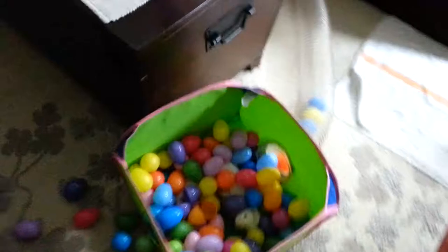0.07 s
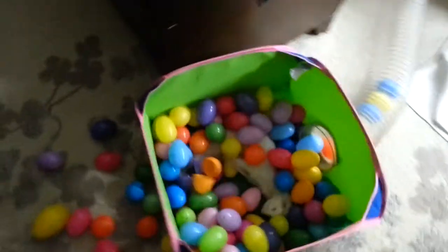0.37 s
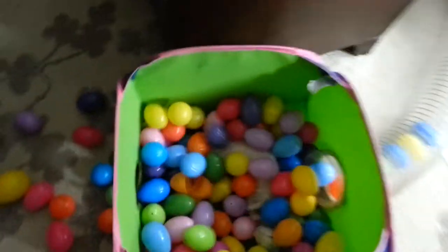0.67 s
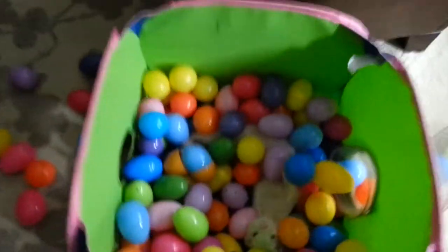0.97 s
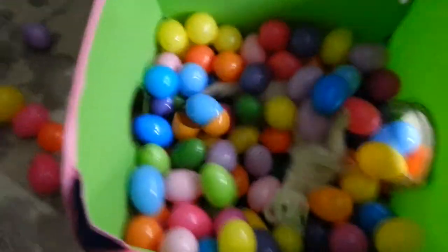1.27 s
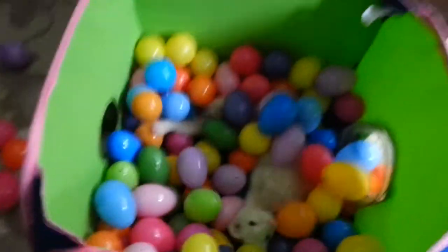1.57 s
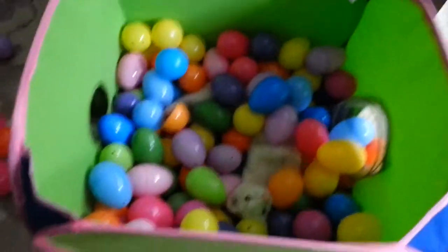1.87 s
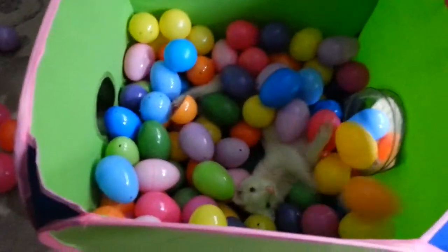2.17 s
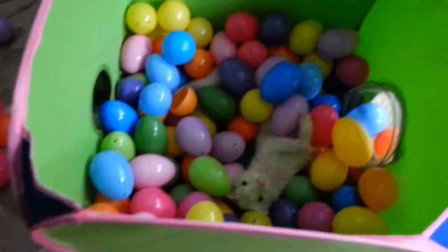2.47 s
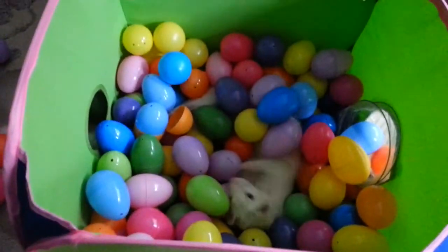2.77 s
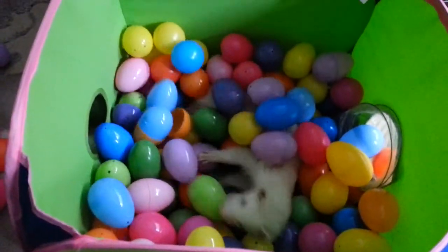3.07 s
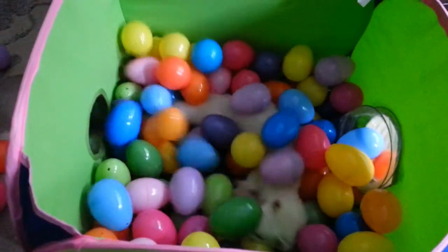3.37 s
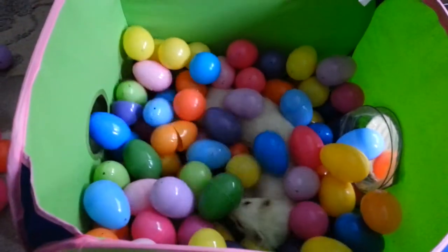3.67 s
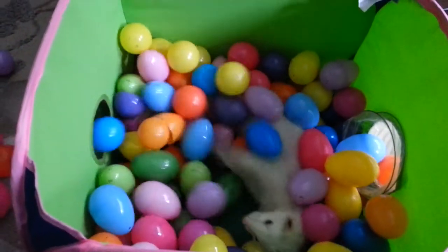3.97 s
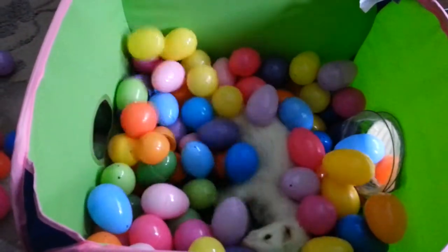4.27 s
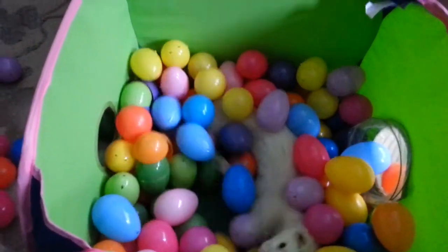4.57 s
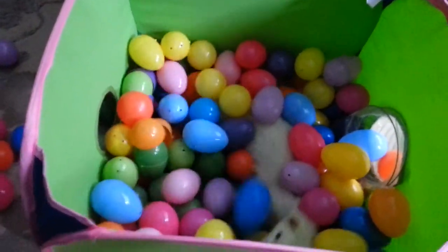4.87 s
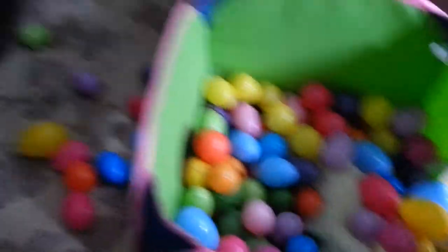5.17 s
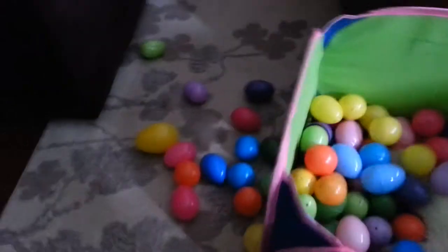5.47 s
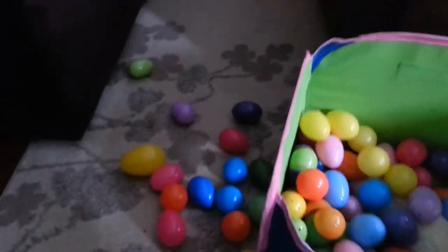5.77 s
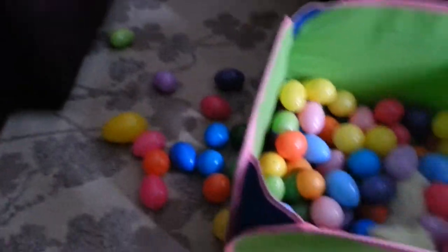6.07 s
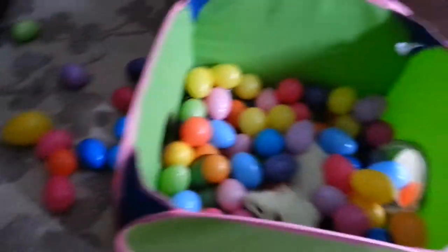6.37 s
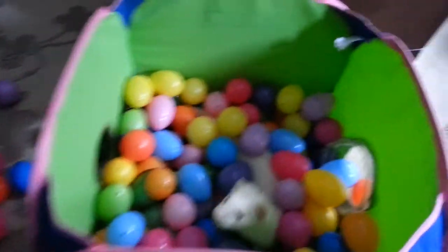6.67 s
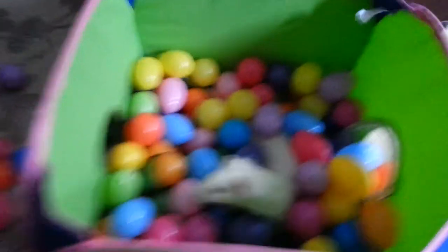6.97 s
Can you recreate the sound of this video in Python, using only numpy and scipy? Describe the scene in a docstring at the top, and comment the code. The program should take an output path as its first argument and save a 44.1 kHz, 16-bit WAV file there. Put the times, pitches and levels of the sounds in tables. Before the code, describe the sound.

A ferret burrows through hollow plastic balls and eggs in a fabric bin. The shells knock, click and snap together over lighter jostling, rubbing and an occasional scrape. The clatter pauses briefly, returns at its busiest with a few soft thuds on the bin's floor, then thins to scattered, softer knocks. It is heard close up, mostly a little to the right, in a small, quiet room.

```python
"""Ferrets burrow through a fabric bin of hollow plastic balls and eggs on a carpet, in a small room.
After 0.4 s of silence, shells knock, click and snap together over a jostle of lighter touches, rubbing
and the odd scrape. The animals pause around 2.5 s, then dig hardest from 3 to 5 s, thudding softly on
the bin's floor. Near 5.5 s the sound swings from the right to the centre, then drifts back to the right
with a few last, softer knocks. A short room wash and a low room tone sit behind it all."""
import sys
import numpy as np
from scipy import signal
from scipy.fft import rfft, irfft, next_fast_len
from scipy.io import wavfile
from scipy.ndimage import uniform_filter1d, map_coordinates

SR = 44100
rng = np.random.default_rng(int(sys.argv[2]) if len(sys.argv) > 2 else 0)


def digitize_waveform(pressure):
    """Quantize a signal to 16-bit integers and store it at the path in sys.argv[1].

    Rows of a 2-D input are taken as channels; values are limited to [-1, 1].
    """
    field = np.atleast_2d(pressure).T
    bounded = np.clip(field, -1, 1)
    quanta = np.round(bounded * 32767).astype(np.int16)
    wavfile.write(sys.argv[1], SR, quanta)


N = 310023
START_S = .425

# Featured collisions: start_s, pitch_hz (of the knock), knock_db, click_db, snap_db
HITS = [(0.439, 2110, -51, -36.5, -63), (0.494, 1770, -26.5, -31, -38), (0.547, 2000, -25, -26.0, -36),
        (0.596, 2010, -22.5, -24.5, -27.5), (0.64, 1150, -19.5, -24.5, -39), (0.658, 1300, -24, -29.5, -44),
        (0.83, 1550, -59, -39, -29), (0.87, 2000, -21.5, -21.5, -29), (0.93, 990, -30, -28.5, -33),
        (0.993, 1980, -24, -36.0, -46), (1.108, 1510, -28.5, -33, -34), (1.129, 1530, -27.5, -29.5, -29.5),
        (1.237, 1650, -21.5, -25, -26.5), (1.269, 1600, -23, -21, -28), (1.344, 1460, -31, -23, -18.5),
        (1.391, 1380, -20.5, -16.5, -35), (1.414, 990, -40, -33, -11), (1.422, 1390, -21, -35, -38),
        (1.497, 1470, -18, -24, -21.5), (1.52, 1640, -18, -18, -25), (1.585, 980, -18, -27.5, -51),
        (1.651, 1240, -24, -14.0, -25.0), (1.749, 2140, -28.5, -36, -47), (1.817, 462, -30.0, -32.5, -35.5),
        (1.836, 2040, -34, -34, -36.5), (1.87, 960, -28, -29.5, -36), (1.901, 1710, -31.5, -40.5, -39),
        (2.004, 1560, -34.0, -39.5, -47), (2.102, 950, -30.5, -27, -38), (2.174, 980, -50, -46, -35.5),
        (2.2, 480, -29.5, -35, -39), (2.247, 920, -30, -36, -41), (2.256, 1580, -35.5, -35, -39),
        (2.341, 1400, -33, -32.5, -36), (2.37, 1710, -29.5, -27.5, -35.5), (2.832, 447, -38, -40.5, -30),
        (3.116, 530, -32, -21, -21), (3.192, 1400, -16.0, -13, -15.0), (3.215, 2100, -18, -20, -28),
        (3.282, 1720, -22.5, -22, -31), (3.296, 870, -25, -17, -22.5), (3.328, 780, -19.5, -21, -18.5),
        (3.357, 1700, -15.5, -23, -23), (3.431, 1620, -18.5, -21.5, -20.5), (3.503, 1730, -24, -28.5, -24),
        (3.552, 1410, -25.5, -34, -32), (3.585, 1300, -19.5, -22.5, -26.5), (3.631, 990, -18.5, -25.5, -30),
        (3.708, 527, -17, -18.5, -26.5), (3.78, 800, -17.5, -24.0, -26), (3.839, 1310, -22.5, -17.5, -24),
        (3.892, 550, -23.5, -15, -19), (3.977, 1280, -20, -25.5, -31.5), (4.044, 1190, -16, -17, -14.5),
        (4.126, 1680, -22.5, -27, -40), (4.171, 1240, -27, -17.5, -18), (4.211, 1790, -19.5, -17.5, -17),
        (4.23, 1370, -24, -19, -14.5), (4.305, 490, -25, -22, -19), (4.419, 840, -22.5, -22, -21),
        (4.46, 1750, -17.5, -17.5, -22), (4.504, 470, -20.5, -13.5, -16), (4.521, 880, -19.5, -20.5, -19),
        (4.593, 830, -44, -23, -16), (4.639, 656, -28, -26, -40), (4.697, 800, -19.5, -21.5, -20),
        (4.73, 660, -23.5, -24, -28), (4.843, 1530, -16, -17.5, -19), (4.949, 1220, -27.5, -27, -23.5),
        (4.995, 800, -27, -17.0, -30), (5.063, 1390, -32.5, -30, -36), (5.11, 634, -27.5, -27.5, -48),
        (5.16, 1010, -26, -36.5, -56), (5.224, 925, -25, -18, -31), (5.25, 1250, -24.5, -19.5, -41),
        (5.305, 1720, -30, -31.0, -30), (5.99, 980, -27, -42.0, -47.5), (6.117, 480, -31, -42, -49),
        (6.15, 507, -41, -41, -44), (6.216, 640, -36.5, -53, -52), (6.256, 1510, -39.5, -49, -57),
        (6.311, 463, -40, -37, -34), (6.409, 625, -35.5, -47.0, -45), (6.534, 950, -44, -39.5, -45.5),
        (6.559, 1600, -36, -40, -39), (6.639, 945, -22.5, -24.5, -33), (6.784, 663, -36, -62, -54),
        (6.84, 700, -37.5, -56, -64), (6.875, 1640, -42, -34.5, -41.5), (6.904, 1000, -27.5, -33.5, -37),
        (7.023, 423, -35.5, -46, -39.5)]
# Where the bin sits in the stereo image: time_s, pan_db (left minus right)
PAN = [(.5, -2.5), (3, -5.5), (5.2, -2), (5.6, 1), (6.2, 0.5), (6.9, -3.5)]
# Modes of a ball's hollow body, stiff shell and thin rim: centre_hz, width_hz, level_db
HOLLOW_MODES = [(491.5, 125, 0), (672, 265, -2), (898, 180, -2), (1326, 225, -3.5), (1570, 430, -5.5),
                (2460, 840, -12.5)]
SHELL_MODES = [(2620, 780, -12), (4027, 700, -4.5), (4600, 490, 1.5), (5670, 1550, -13.5)]
RIM_MODES = [(6700, 2800, -2), (9310, 1170, 0), (11320, 1600, -1.5), (14600, 8300, -6)]


def collisions():
    """Hard hits: the hollow body knocks, the shell clicks and the rim snaps, in a new blend each time."""
    start_s, pitch_hz, knock_db, click_db, snap_db = np.transpose(HITS)
    knock = strike(start_s, knock_db + .5, HOLLOW_MODES, chatter_s=.0021, shadow=.24, pitch_hz=pitch_hz)
    click = strike(start_s, click_db + 1.2, SHELL_MODES, chatter_s=.002, shadow=1.9)
    snap = strike(start_s, snap_db + .6, RIM_MODES, chatter_s=.0018, shadow=1.5)
    return knock + click + snap


def strike(start_s, level_db, modes, chatter_s, shadow, pitch_hz=None, bass_hz=140):
    """Short contacts, each ringing a slightly different ball; shadow scales the level panning."""
    size, count = 1024, len(start_s)
    lead = size // 5
    t, hz = (np.arange(size) - lead) / SR, np.fft.rfftfreq(size, 1 / SR)
    chance = rng.standard_normal((count, len(modes), 2, 1))
    body = 0
    for k, (centre_hz, width_hz, mode_db) in enumerate(modes):
        gain = (-1) ** k * amp(mode_db + 3 * chance[:, k, 0])
        body += gain * resonance(hz, centre_hz * np.exp(.098 * chance[:, k, 1]), width_hz)
    if pitch_hz is not None:
        body += amp(7) * resonance(hz, pitch_hz[:, None], width_hz=pitch_hz[:, None] / 9.2)
    # a brief slip, the impact, then the shell chatters against its neighbours
    age = np.maximum(t, 0)
    slip = amp(-18) * np.exp(-abs(t) / .0018)
    impact = (1 - np.exp(-age / .0004)) * np.exp(-age / chatter_s)
    push = rfft((slip + impact) * rng.standard_normal((2, count, size)))
    # three weak echoes off nearby balls, bin and furniture colour each contact
    delay_s = rng.uniform(.002, .012, (count, 3, 1))
    comb = 1 + amp(-15) * np.sum(np.exp(-2j * np.pi * hz * delay_s), axis=1)
    radiation = (1j * hz / (bass_hz + 1j * hz)) ** 2  # a ball is too small to radiate bass
    pair = stereo(*push, hz, apart_hz=2500) * body * comb * radiation
    # the far side is later and weaker
    pan_db = curves(PAN, start_s)[0][:, None] + 1.63 * rng.standard_normal((count, 1))
    side_db = np.array([.5, -.5])[:, None, None] * pan_db
    early_s = side_db * 3.2e-5
    ring = irfft(pair * np.exp(2j * np.pi * hz * early_s)) * amp(shadow * side_db)
    ring *= np.clip((t[-1] - t) / .004, 0, 1)
    energy = np.mean(np.sum(ring ** 2, axis=2), axis=0)
    ring *= (amp(level_db) / np.sqrt(energy / (.005 * SR)))[:, None]  # rms as if packed into 5 ms
    where = (np.round(start_s * SR).astype(int)[:, None] - lead + np.arange(size)).ravel()
    return np.array([np.bincount(where, channel.ravel(), N)[:N] for channel in ring])


def jostle(count=900, colour_db=3):
    """Light touches all through the heap, riding its unrest, thinner than the hard hits."""
    chance = rng.standard_normal((count, 4))
    start_s = np.clip(np.linspace(START_S, N / SR, count) + .003 * chance[:, 0], START_S, N / SR)
    hollow_db, bright_db = unrest(start_s) + 4.5 * np.minimum(chance[:, 1], 1.8)
    knock_db = hollow_db - 1.5 + colour_db * np.minimum(chance[:, 2], 1)
    snap_db = bright_db - 8.5 + colour_db * chance[:, 3]
    knock = strike(start_s, knock_db, HOLLOW_MODES, chatter_s=.0024, shadow=.13, bass_hz=350)
    click = strike(start_s, bright_db - 7.5, SHELL_MODES, chatter_s=.0037, shadow=2.6)
    snap = strike(start_s, snap_db, RIM_MODES, chatter_s=.0056, shadow=1.8)
    return knock + click + snap


def unrest(at_s, build_db_per_s=1599, spread_s=.0027, settle_db_per_s=267.5):
    """The heap's hollow and bright envelopes in dB: digging, a grind into each hit, a rattle after."""
    # How hard the animals dig: time_s, effort_db
    digging = [(0.46, -37.5), (0.66, -25), (0.82, -34.5), (0.92, -29.5), (1.06, -45), (1.25, -32.5),
               (1.39, -25.5), (1.68, -31), (1.96, -53.5), (2.3, -47), (2.5, -62), (2.78, -64.5),
               (2.98, -33.5), (3.07, -37), (3.26, -22), (3.67, -36.5), (3.78, -26), (4.2, -19.5),
               (4.38, -28), (4.55, -27), (4.8, -34), (5.0, -32), (5.42, -38), (5.5, -31), (5.72, -30),
               (5.89, -42), (6.04, -32), (6.2, -48), (7.0, -45)]
    start_s, _, knock_db, click_db, _ = np.transpose(HITS)
    t = np.arange(0, N / SR, .002)
    age = t[:, None] - start_s
    grind = (age < 0) * amp(.5 - build_db_per_s * abs(age))
    rattle = (age > 0) * (1 - np.exp(-abs(age) / spread_s)) * amp(-settle_db_per_s * abs(age))
    flurries = (grind + rattle) ** 2
    effort_db, = curves(digging, t)
    hollow = amp(effort_db - 4) ** 2 + flurries @ amp(knock_db - 9.5) ** 2
    bright = amp(effort_db - 2) ** 2 + flurries @ amp(click_db - 11) ** 2
    return [np.interp(at_s, t, 10 * np.log10(power)) for power in (hollow, bright)]


def rubbing():
    """Shells slide over each other and over fur: a hollow murmur and a fine crackle."""
    # Tone of the murmur and of the crackle: frequency_hz, level_db
    murmur_eq = [(100, -42), (250, -18.5), (480, -2), (1000, -3), (1700, -2.5), (2600, -11), (5000, -26.5)]
    crackle_eq = [(1000, -42), (2600, -15.5), (3600, 4), (4600, 4), (6200, -13), (9500, -10.5),
                  (14500, -19)]
    hollow_db, bright_db = unrest(np.arange(N) / SR)
    murmur = amp(hollow_db - 9 + 2.5 * wobble(rate_hz=70)) * noise(murmur_eq, apart_hz=1800)
    crackle = amp(bright_db - 7.5) * stick_slip(crackle_eq, grain_db=6, rate_hz=500)
    return murmur + crackle


def scrapes(fade_s=.015):
    """A shell drags along another or along the bin's wall with a broad rasp."""
    # Drags: start_s, length_s, level_db
    drags = [(0.433, 0.06, -59), (1.354, 0.047, -19), (2.089, 0.041, -35), (3.855, 0.03, -15),
             (4.147, 0.11, -25), (5.223, 0.057, -28.5), (5.998, 0.07, -37), (6.63, 0.069, -27.5)]
    # Tone of the rasp: frequency_hz, level_db
    rasp_eq = [(150, -58.5), (500, 2), (1600, 2.5), (2800, 1), (4500, 0.5), (7000, -0.5), (14500, -3.5)]
    t = np.arange(N) / SR
    envelope = sum(amp(level_db) * np.clip(np.minimum(t - start_s, start_s + length_s - t) / fade_s, 0, 1)
                   for start_s, length_s, level_db in drags)
    return envelope * stick_slip(rasp_eq, grain_db=3.5, rate_hz=510)


def stick_slip(eq, grain_db, rate_hz):
    """Friction catches and lets go: noise in fine uneven grains, panned with the bin."""
    pan_db, = curves(PAN, np.arange(N) / SR)
    grains = amp(grain_db * np.minimum(wobble(rate_hz), 2))
    return unit(grains * noise(eq, apart_hz=1800) * amp(np.array([pan_db, -pan_db]) / 2))


def floor_thuds(swell_s=.006, fade_s=.011):
    """The bin's soft floor murmurs under the paws and thumps when a body drops onto it."""
    # Body drops: peak_s, level_db
    drops = [(1.39, -58), (1.52, -56), (3.192, -40), (3.29, -33), (4.029, -36.5), (4.2, -48), (4.5, -45),
             (6.645, -52)]
    # Tone of the floor under paws and under a body: frequency_hz, level_db
    paws_eq = [(20, -42), (50, -38.5), (110, -17), (190, 0.5), (290, 4), (450, 5.5), (1000, -35)]
    thump_eq = [(20, -18.5), (50, -13), (90, -5), (160, 5), (260, -7.5), (500, -37)]
    t = np.arange(N) / SR
    hollow_db, _ = unrest(t)
    paws = amp(hollow_db - 18 + 4.96 * wobble(rate_hz=35)) * noise(paws_eq, apart_hz=450)
    weight = sum(amp(level_db) * np.exp(-np.maximum((t - peak_s) / fade_s, (peak_s - t) / swell_s))
                 for peak_s, level_db in drops)
    return paws + weight * noise(thump_eq, apart_hz=110)


def room_wash(x, predelay_s=.0046, blur_octaves=.4):
    """Walls and furniture return the sound of the balls as a diffuse, dying wash."""
    # Reverb time: frequency_hz, t60_s
    decay = [(150, 0.22), (500, 0.26), (1400, 0.093), (4000, 0.12), (12000, 0.17)]
    # Tone of the reflections: frequency_hz, level_db
    walls_eq = [(50, -21), (170, -18), (480, 1), (1000, -5), (2600, -2), (4200, 1), (6500, -6), (13000, -2)]
    delayed = np.pad(x, ((0, 0), (round(predelay_s * SR), 0)))[:, :N]
    hz, t, frames = signal.stft(delayed, SR, nperseg=256)
    octave = np.log2(hz + 40)
    blur = np.exp(-((octave[:, None] - octave) / blur_octaves) ** 2)
    power = (blur / blur.sum(axis=1, keepdims=True)) @ np.mean(abs(frames) ** 2, axis=0)
    feedback = amp(-60 * t[1] / along(decay, hz)) ** 2
    tail_power = np.array([signal.lfilter([1 - k], [1, -k], band) for k, band in zip(feedback, power)])
    wash = signal.stft(rng.standard_normal((2, N)), SR, nperseg=256)[2]
    wash = stereo(*wash, hz[:, None], apart_hz=1100) / np.std(wash)
    # as the balls move they feed ever different room modes
    drift_db = 2.5 * unit(uniform_filter1d(rng.standard_normal(tail_power.shape), size=25, axis=1))
    colour = amp(drift_db + along(walls_eq, hz)[:, None])
    return signal.istft(wash * np.sqrt(tail_power) * colour, SR, nperseg=256)[1][:, :N]


def room_tone():
    """A low, steady bed of noise."""
    # Tone of the quiet room: frequency_hz, level_db
    bed_eq = [(20, -25), (55, -26.5), (85, -13.5), (118, -10.5), (170, -8), (240, -5), (400, -15.5),
              (1000, -30.5), (6000, -33.5), (14500, -31)]
    return amp(-58.5) * noise(bed_eq, apart_hz=109.7)


def amp(db):
    """Decibels to gain."""
    return 10 ** (np.asarray(db) / 20)


def unit(x):
    """Scale to rms 1."""
    return x / np.sqrt(np.mean(x ** 2) + 1e-20)


def along(points, hz):
    """Read (frequency_hz, value) points on a log axis."""
    knots_hz, values = np.transpose(points)
    return np.interp(np.log(hz + 1), np.log(knots_hz), values)


def curves(rows, at_s):
    """Each column after the time, read at the given moments."""
    time_s, *columns = np.transpose(rows)
    return [np.interp(at_s, time_s, column) for column in columns]


def wobble(rate_hz):
    """A smooth random curve, rate_hz knots a second."""
    knots = rng.standard_normal(int(N * rate_hz / SR) + 4)
    return map_coordinates(knots, [np.arange(N) * rate_hz / SR])


def resonance(hz, centre_hz, width_hz):
    """Response of one damped mode."""
    return 1j * hz * width_hz / (centre_hz ** 2 - hz ** 2 + 1j * hz * width_hz)


def stereo(mid, side, hz, apart_hz):
    """Left and right from two unrelated spectra: mono in the bass, wide above apart_hz."""
    turn = np.pi / 4 * hz / np.hypot(hz, apart_hz)
    mid, side = mid * np.cos(turn), side * np.sin(turn)
    return np.array([mid + side, mid - side])


def noise(eq, apart_hz):
    """Coloured stereo noise of rms 1."""
    size = next_fast_len(N)
    hz = np.fft.rfftfreq(size, 1 / SR)
    pair = stereo(*rfft(rng.standard_normal((2, size))), hz, apart_hz)
    return unit(irfft(pair * amp(along(eq, hz)), size)[:, :N])


def scene():
    """The heap of balls up front, with its reverb, the bin's floor and the room tone behind."""
    heap = collisions() + jostle() + rubbing() + scrapes()
    return heap + amp(-5.5) * room_wash(heap) + floor_thuds() + room_tone()


def record(dry):
    """Fade in quickly at START_S, clip at full scale and cut the top end steeply."""
    fade_s, top_hz = .008, 14600
    fade_in = np.clip((np.arange(N) / SR - START_S) / fade_s, 0, 1)
    clipped = np.clip(dry * fade_in, -1, 1)
    size = next_fast_len(N + SR // 2)
    cut_db = np.clip((np.fft.rfftfreq(size, 1 / SR) - top_hz) / 25, 0, 120)
    return irfft(rfft(clipped, size) * amp(-cut_db), size)[:, :N]


dry = scene()
out = record(dry)
digitize_waveform(out)
```